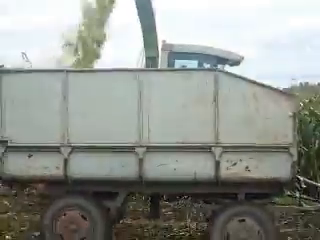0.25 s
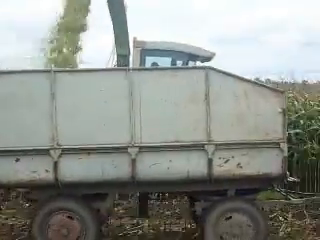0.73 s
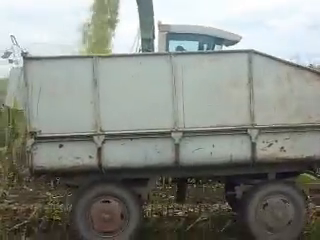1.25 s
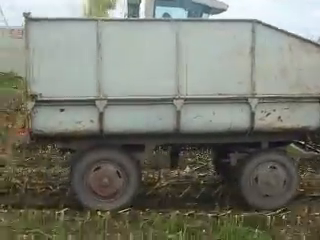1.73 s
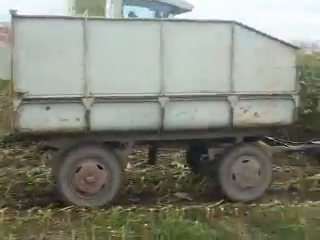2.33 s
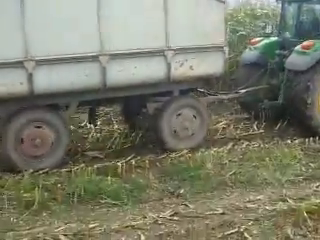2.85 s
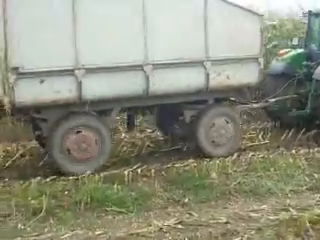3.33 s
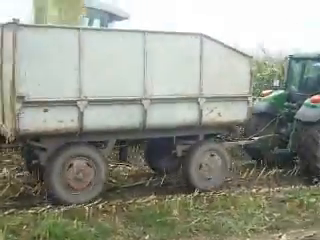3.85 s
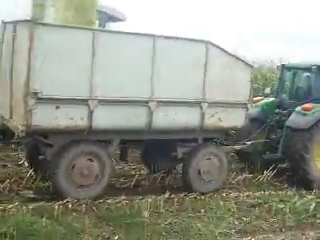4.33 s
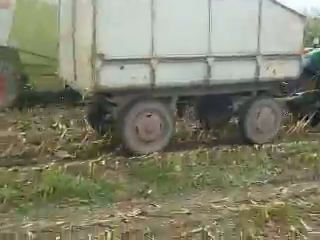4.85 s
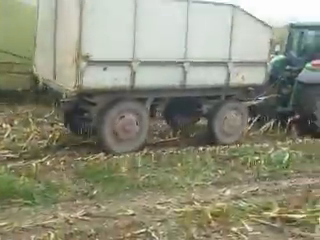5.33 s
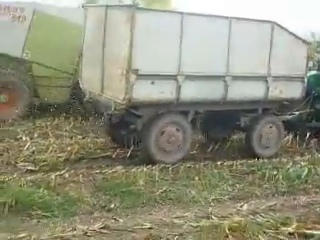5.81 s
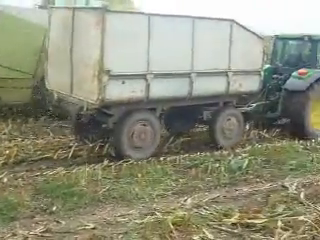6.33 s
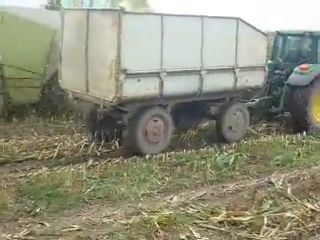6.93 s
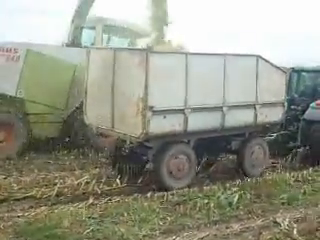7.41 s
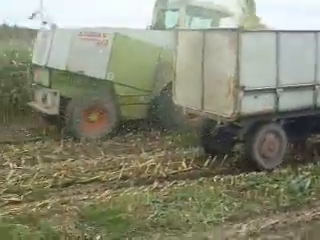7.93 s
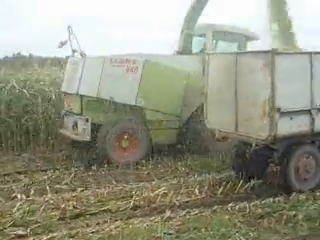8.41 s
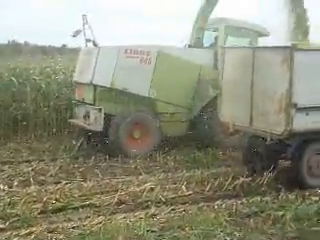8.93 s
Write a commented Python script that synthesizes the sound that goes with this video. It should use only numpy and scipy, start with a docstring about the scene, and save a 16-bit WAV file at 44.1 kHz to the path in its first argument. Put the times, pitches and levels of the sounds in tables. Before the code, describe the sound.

A diesel forage harvester drones and hums while chopping maize, first muffled beneath buffeting wind, then clear, with roar, hiss and faint gear whine.

```python
"""At first a trailer screens a forage harvester chopping maize, while wind gusts thump and pop in the microphone.
Noise bursts make the gusts, and the camera's gain control ducks everything under them.
At about two to three seconds the screen clears: filtered noise makes the crop roar and hiss, cut at the knife rate.
Sine tones tied to one engine speed make diesel, cutter drum and gear whine; two stalks split soon after 4 s.
From 5 to 7 s the harvester turns its tail and stalks swish once; a tractor drones low all along."""
import sys
import numpy as np
from scipy import signal
from scipy.fft import rfft, irfft, next_fast_len
from scipy.io import wavfile
from scipy.ndimage import uniform_filter1d, map_coordinates

SR = 44100
rng = np.random.default_rng(int(sys.argv[2]) if len(sys.argv) > 2 else 0)


def transcribe(u):
    """Save the signal u as a 16-bit wav file named by the first command-line argument.

    u: samples, shape (n,) or (channels, n), limited to [-1, 1]; the rate is SR.
    q: integer samples, one column per channel.
    """
    v = np.clip(np.atleast_2d(u).T, -1, 1)
    q = np.round(v * 32767).astype(np.int16)
    wavfile.write(sys.argv[1], SR, q)


N = 403956

# gear whine and knife passes, as multiples of the crankshaft speed
WHINE_ORDER, KNIFE_ORDER = 43.87, 4.542
# how strongly the working harvester's rumble, roar and hiss come through: (time [s], level [dB])
HARVESTER_PRESENCE = [(0, -6), (1.3, -5.5), (1.85, -5), (2.2, -3.5), (2.55, 0.5), (3.1, 0), (3.4, 2.5),
                      (3.65, 0), (4.5, 3), (5, 0.95), (6.05, 0.1), (6.25, -2.5), (7.5, -3), (8.35, -1.5),
                      (8.8, 1), (9.16, .5)]
# how much the trailer hides the harvester: (time [s], share hidden [0-1])
TRAILER_SCREEN = [(1.8, 0.95), (2.7, 0.05)]
# how far the harvester has turned its tail to the microphone: (time [s], share [0-1])
SEEN_FROM_BEHIND = [(0, 0.12), (5.2, 0.07), (6.6, 0.88), (9.16, 1)]


def amp(db):
    """Turn decibels into a gain."""
    return 10 ** (np.asarray(db) / 20)


def unit(x):
    """Scale to an rms (average strength) of 1."""
    return x / np.sqrt(np.mean(x ** 2) + 1e-20)


def clock():
    """Give the time of every sample in seconds."""
    return np.arange(N) / SR


def curve(rows):
    """Draw straight lines through (time, value) points, one value per sample."""
    return np.interp(clock(), *np.transpose(rows))


def wobble(rate):
    """Draw a smooth curve through random points, rate points a second."""
    points = rng.standard_normal(int(N * rate / SR) + 4)
    return map_coordinates(points, [clock() * rate])


def swell(s, db, half):
    """Make a bell-shaped rise and fall around time s."""
    return amp(db) * np.exp(-.5 * ((clock() - s) / half) ** 2)


def lagged(x, seconds):
    """Follow x sluggishly, with a time constant in seconds."""
    keep = np.exp(-1 / (seconds * SR))
    return signal.lfilter([1 - keep], [1, -keep], x)


def filtered(x, response):
    """Multiply the spectrum of x by a gain that depends on frequency."""
    size = next_fast_len(N + 8192)
    gain = response(np.fft.rfftfreq(size, 1 / SR))
    return irfft(rfft(x, size) * gain, size)[:N]


def coloured(x, spectrum):
    """Filter x by (frequency, relative level) points, then scale to rms 1."""
    f, db = np.transpose(spectrum)
    return unit(filtered(x, lambda hz: amp(np.interp(np.log(hz + 1), np.log(f), db))))


def rush(patchy_db):
    """Make white noise with patches of random gain in time and frequency."""
    spectrum = signal.stft(rng.standard_normal(N), nperseg=512)[2]
    patches = uniform_filter1d(rng.standard_normal(spectrum.shape), size=6, axis=0)
    patches = uniform_filter1d(patches, size=14, axis=1)
    patchy = spectrum * amp(patchy_db * unit(patches))
    return unit(signal.istft(patchy, nperseg=512)[1][:N])


def grains(rate, spread_db):
    """Scatter clicks of uneven size at random, about rate a second."""
    hits = rng.random(N) < rate / SR
    sizes = rng.standard_normal(N) * amp(spread_db * rng.standard_normal(N))
    return unit(hits * sizes)


def partial(angle, flutter_db, drift, rate):
    """Make a tone of rms 1 whose strength and phase waver in the moving air."""
    strength = amp(flutter_db * wobble(rate))
    phase = drift * wobble(rate) + 2 * np.pi * rng.random()
    return unit(strength * np.sin(angle + phase))


def crank_angle():
    """Add up the engine speed into the crankshaft angle in radians; it varies slightly."""
    # engine speed, given as the pitch of the gear whine: (time [s], pitch [Hz])
    whine_pitch = [(0, 1700), (.95, 1691), (1.25, 1718), (2.35, 1695), (2.9, 1705), (3.65, 1678), (4, 1681),
                   (4.25, 1706), (4.6, 1693), (4.9, 1711), (5.2, 1700), (5.6, 1713), (6.2, 1693),
                   (6.5, 1709), (7.65, 1710), (7.9, 1688), (8.25, 1711), (8.75, 1697)]
    turns_per_second = curve(whine_pitch) / WHINE_ORDER
    return 2 * np.pi * np.cumsum(turns_per_second) / SR


def cyclic(angle):
    """Make clatter that repeats each engine cycle (two turns), its pattern slowly changing."""
    size = 1024  # points in one cycle
    place = angle / (4 * np.pi) * size
    cycles = rng.standard_normal((4, size))
    patterns = np.array([map_coordinates(cycle, [place], mode="grid-wrap", order=1) for cycle in cycles])
    weights = np.array([wobble(1.601) for _ in patterns])
    return unit(np.sum(weights * patterns, axis=0) / np.linalg.norm(weights, axis=0))


def tractor():
    """The tractor's slower engine drones low: crankshaft tones over a muffled exhaust rumble."""
    turns_hz = 33.7
    # loudness of the whole tractor: (time [s], level [dB])
    loudness = [(0, -54), (2.9, -46.5), (3.6, -55), (6.1, -45.5), (6.8, -53.5), (7.3, -44), (7.9, -44),
                (8.4, -52.5), (9.16, -48)]
    # engine tones: (multiple of the crankshaft speed, relative level [dB])
    engine_tones = [(1, -11.5), (2, 0.5), (3, -5.5), (5, -10.5), (6, -10)]
    # muffled exhaust rumble: (frequency [Hz], relative level [dB])
    exhaust_spectrum = [(25, -14.5), (44, -15.5), (58, -0.5), (72, 2), (100, -9), (140, -17.5), (300, -47)]
    angle = 2 * np.pi * turns_hz * clock()
    tones = unit(sum(amp(db) * partial(round(order) * angle, flutter_db=2.0, drift=0.4, rate=4)
                     for order, db in engine_tones))
    exhaust = coloured(rng.standard_normal(N), exhaust_spectrum)
    return amp(curve(loudness)) * unit(tones + exhaust)


def pop(s, db):
    """An overloaded capsule gives a rounded spike between two shallow dips; harder pops are narrower."""
    half_width = 0.00034 * amp(-.3 * db)  # seconds; grows as the pop gets weaker
    u = (clock() - s) / half_width
    return amp(db) * (1 - u * u) / (1 + u * u) ** 2


def wind():
    """Gusts break into eddies that thump the microphone, the hardest with a pop, over a steady push."""
    # all levels here are those ahead of the gain control
    # steady push of the wind: (time [s], level [dB])
    breeze = [(0, -32.5), (.3, -24.5), (.9, -31.5), (1.3, -36.5), (1.6, -31.5), (2.1, -33.5), (3.2, -43.5),
              (4, -60)]
    # gusts that hit the microphone: (start [s], length [s], level [dB])
    gust_list = [(0.192, 0.056, -22.5), (.264, .04, -20), (0.329, .07, -19), (.405, 0.091, -17.5),
                 (0.572, .045, -23.5), (.65, 0.14, -23), (0.959, .07, -23.5), (1.051, .045, -20.5),
                 (1.139, .1, -26.5), (1.382, .02, -18), (1.425, .1, -21.5), (1.547, .125, -23),
                 (1.768, .025, -19.5), (1.834, 0.028, -22.5), (2.038, .06, -25.5), (2.899, .04, -24)]
    # the hardest pops, where an eddy overloads the capsule: (time [s], peak level [dB])
    hard_pops = [(.223, -8), (0.295, -8), (0.353, -3), (.437, -2.5), (.486, -2), (.671, -6), (.713, -10.5),
                 (0.739, -9.5), (.771, -10.5), (1.014, -9), (1.058, -12.5), (1.431, -4), (1.490, -4.5),
                 (1.521, -8), (1.632, -9.5), (1.657, -9.5), (2.066, -11.5)]
    # tone colour of wind on the microphone: (frequency [Hz], relative level [dB])
    buffet_spectrum = [(25, -34), (55, -13.5), (90, -6), (150, 2), (250, 1.5), (390, -3), (600, -8),
                       (1000, -18), (1500, -27), (2500, -36.5), (5000, -74)]
    gust_edge_s = .006
    eddy_db, eddy_rate = 5, 125  # depth, random points a second
    small_pop_rate, small_pop_db = 45, -9.5  # about how many a second, level against the gust
    t = clock()
    gusts = sum(amp(db) * np.clip(np.minimum(t - s, s + length - t) / gust_edge_s + .5, 0, 1)
                for s, length, db in gust_list)
    eddies = unit(amp(eddy_db * np.tanh(wobble(eddy_rate))))
    turbulence = coloured(rng.standard_normal(N) * amp(2.2 * wobble(350)), buffet_spectrum)
    # the capsule's swing is bounded, so strong eddies keep an even height
    swing = unit(np.tanh(0.45 * turbulence))
    small_pops = amp(small_pop_db) * coloured(grains(rate=small_pop_rate, spread_db=1.5), buffet_spectrum)
    lumps = rng.standard_normal(N) + .8 * grains(rate=160, spread_db=0.5)
    base = amp(curve(breeze) + 1.5 * wobble(25)) * coloured(lumps, buffet_spectrum)
    pops = sum(pop(s, db) for s, db in hard_pops)
    return gusts * (eddies * swing + small_pops) + base + pops


def stalks():
    """Dry stalks split in short sprays of crackling noise, and once swish over sheet metal."""
    # maize stalks cracking: (time [s], highest level [dB])
    split_list = [(4.092, -32), (4.778, -28.5)]
    # stalks sliding over metal: one (time [s], highest level [dB], width of the bell on each side [s])
    swish = (6.42, -41, 0.054)
    # tone colour of the splits: (frequency [Hz], relative level [dB])
    crackle_spectrum = [(3200, -26), (4400, -6.5), (5100, 0.5), (6000, 0), (6900, -4.5), (7800, -30)]
    # tone colour of the swish: (frequency [Hz], relative level [dB])
    slide_spectrum = [(1500, -25.5), (1880, 0), (2120, 1), (2350, -16.5), (3200, -29), (6000, -71)]
    rise_s, decay_s = 0.0037, .04  # seconds per 60 dB
    t = clock()
    splits = sum(amp(db - 60 * np.abs(t - s) / np.where(t < s, rise_s, decay_s)) for s, db in split_list)
    crackle = splits * coloured(rng.standard_normal(N), crackle_spectrum)
    slide = swell(*swish) * coloured(rng.standard_normal(N), slide_spectrum)
    return crackle + slide


def gears(angle):
    """The drive gears whine at a multiple of the engine speed, in short random swells."""
    # the whine comes and goes as the machines move: (time [s], level [dB])
    whine_level = [(0, -60), (.6, -56), (.9, -46), (1.35, -48), (1.7, -53), (2.1, -48.5), (2.7, -51.5),
                   (3.2, -41), (3.65, -45.5), (3.95, -37.5), (4.35, -50), (4.65, -43), (5.15, -43),
                   (5.4, -58), (5.7, -44), (6.8, -46.5), (7.6, -47.5), (9.16, -49)]
    swell_db, swell_rate = 5.5, 7  # depth, random points a second
    swells = unit(amp(swell_db * np.tanh(wobble(swell_rate))))
    whine = partial(WHINE_ORDER * angle, flutter_db=1.6, drift=0.35, rate=35)
    return amp(curve(whine_level)) * swells * whine


def diesel(angle):
    """The harvester's engine: crankshaft tones over an exhaust rumble partly alike in every cycle."""
    # engine and drive tones, before the trailer screens them:
    # (multiple of the crankshaft speed, level from the side [dB], level from behind [dB])
    engine_tones = [(1, -55, -57.5), (2, -58.5, -50.5), (3.5, -41, -36), (4, -43, -55), (6.5, -44.5, -53),
                    (8, -35.5, -53), (8.25, -52.5, -51), (10, -51, -44), (10.5, -56.5, -48),
                    (12, -45.5, -55.5), (15.97, -47, -57), (17, -57, -54.5), (19.53, -54.5, -57),
                    (20.2, -49, -50.5), (40.25, -51, -62)]
    # exhaust rumble: (frequency [Hz], relative level [dB])
    rumble_spectrum = [(25, -38.5), (55, -18), (85, -7.5), (125, 0), (190, 2.5), (275, -5.5), (330, 3.5),
                       (390, 2.5), (480, -7.5), (700, -16.5), (1500, -58)]
    rumble_base_db, rumble_growth = -31.5, 0.86  # level at 0 dB presence, dB gained per dB of presence
    screen_tones_db, screen_rumble_db = -5, -1  # change when fully hidden by the trailer
    rear_rumble_db = -.5  # change when heard from behind
    behind = curve(SEEN_FROM_BEHIND)
    screen = curve(TRAILER_SCREEN)
    tones = 0
    for order, side_db, rear_db in engine_tones:
        quarter_order = np.round(4 * order) / 4  # the nearest quarter multiple
        tone = partial(quarter_order * angle, flutter_db=2.0, drift=.3, rate=9)
        tones = tones + amp(side_db + behind * (rear_db - side_db)) * tone
    rumble = coloured(rng.standard_normal(N) + .5 * cyclic(angle), rumble_spectrum)
    rumble_db = rumble_base_db + rumble_growth * curve(HARVESTER_PRESENCE)
    rumble_db = rumble_db + screen_rumble_db * screen + rear_rumble_db * behind
    return amp(screen_tones_db * screen) * tones + amp(rumble_db) * rumble


def cutter(angle):
    """Knives passing the shear bar make a strong hum at the knife rate, with weaker overtones."""
    # the hum's lowest tone, at the knife rate: (time [s], level [dB])
    first = [(0, -42), (1.85, -43), (2.7, -29.5), (3.35, -35), (3.47, -23.5), (3.62, -25.5), (3.77, -36.5),
             (3.98, -26), (4.1, -41), (4.3, -29.5), (4.45, -42), (4.6, -35), (5.1, -33), (5.65, -28.5),
             (6, -32), (7.4, -32), (8.8, -30), (9.16, -33.5)]
    # its octave, stronger from behind: (time [s], level [dB])
    second = [(0, -38), (2.5, -44.5), (2.7, -25.5), (2.9, -36.5), (3.08, -25), (3.28, -40.5), (3.42, -31.5),
              (4.7, -33.5), (4.85, -27), (5.3, -29), (6.02, -30.5), (6.17, -21.5), (6.42, -27),
              (6.78, -22.5), (7.55, -23), (7.85, -26.5), (8.3, -25), (8.7, -30), (9.16, -25.5)]
    # the tone at three times the knife rate: (time [s], level [dB])
    third = [(0, -46.5), (1, -47.5), (2, -36.5), (3, -47), (4.4, -57), (5.1, -48.5), (5.4, -35.5),
             (5.85, -35), (6.2, -47), (7.2, -51), (9.16, -56.5)]
    # upper tones: (multiple of the knife rate, level from the side [dB], level from behind [dB])
    overtones = [(4, -48, -41.5), (5, -50.5, -52), (6, -52, -56), (7, -54, -54.5), (8, -60, -66.5),
                 (9, -60.5, -60.5)]
    behind = curve(SEEN_FROM_BEHIND)
    knife = KNIFE_ORDER * angle
    hum = sum(amp(curve(level)) * partial(k * knife, flutter_db=1.0, drift=0.088, rate=18)
              for k, level in enumerate([first, second, third], 1))
    upper = sum(amp(side_db + behind * (rear_db - side_db))
                * partial(round(k) * knife, flutter_db=1.5, drift=0.63, rate=11)
                for k, side_db, rear_db in overtones)
    return hum + upper


def crop(angle):
    """Knives tear an uneven mat of stalks into a roar; chips rattle up the spout and hiss into the trailer."""
    # tone colour of the tearing: (frequency [Hz], relative level [dB])
    roar_spectrum = [(250, -29), (480, -8.5), (650, 3.5), (850, 2.5), (980, -2), (1200, -6), (1450, -5),
                     (1600, -7.5), (1800, -7), (2150, -9), (3000, -16), (6000, -46)]
    # tone colour of the flying chips: (frequency [Hz], relative level [dB])
    hiss_spectrum = [(500, -8), (1200, 6.5), (2200, -0.5), (3200, 0), (4200, -2), (5500, -4), (7000, -6.5),
                     (7900, -12), (8600, -24), (9100, -44)]
    roar_base_db, roar_growth = -34, 1.18  # level at 0 dB flow, dB gained per dB of flow
    hiss_base_db = -37  # level at 0 dB flow
    screen_roar_db, rear_roar_db = -4, -0.9  # change when fully hidden, when heard from behind
    flow_db = curve(HARVESTER_PRESENCE) + 0.48 * wobble(8)
    cuts = 1 + 0.19 * np.cos(KNIFE_ORDER * angle)
    feed = amp(0.24 * wobble(14) + 1.3 * wobble(140))
    tearing = unit(rush(patchy_db=2.2) + .5 * grains(rate=900, spread_db=2.0))
    roar = coloured(cuts * feed * (tearing + .5 * cyclic(angle)), roar_spectrum)
    chips = rush(patchy_db=1) + 0.41 * grains(rate=2500, spread_db=4.5)
    hiss = coloured(chips * amp(0.53 * wobble(30)), hiss_spectrum)
    roar_db = roar_base_db + roar_growth * flow_db
    roar_db = roar_db + screen_roar_db * curve(TRAILER_SCREEN) + rear_roar_db * curve(SEEN_FROM_BEHIND)
    return amp(roar_db) * roar + amp(hiss_base_db + flow_db) * hiss


def scene():
    """Add both machines, the crop and the wind, in the open field."""
    angle = crank_angle()
    harvester = diesel(angle) + cutter(angle) + gears(angle) + crop(angle)
    return (harvester + stalks() + tractor() + wind())[None]


def gain_control(x):
    """The gain drops quickly when the sound passes the threshold, then creeps back up."""
    threshold_db, listening_s = -19.5, 0.0052  # dB rms, time constant
    attack_s, recovery_rate = 0.0026, 23  # time constant, dB per second
    loudness_db = 10 * np.log10(lagged(x ** 2, listening_s) + 1e-12)
    excess_db = np.maximum(loudness_db - threshold_db, 0)
    # holding the highest value along a rising ramp makes each duck fade at a steady rate
    recovery_db = recovery_rate * clock()
    duck_db = np.maximum.accumulate(excess_db + recovery_db) - recovery_db
    return x * amp(-lagged(duck_db, attack_s))


def record(dry):
    """The camera ducks loud moments, rounds off the hardest peaks and keeps only sound below its limit."""
    ceiling, top_hz = .38, 9022  # ceiling as a share of full scale
    ducked = gain_control(dry[0])
    rounded = ducked / (1 + (ducked / ceiling) ** 6) ** (1 / 6)
    return filtered(rounded, lambda hz: hz < top_hz)[None]


dry = scene()
out = record(dry)
transcribe(out)
```